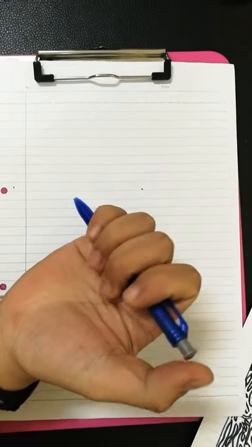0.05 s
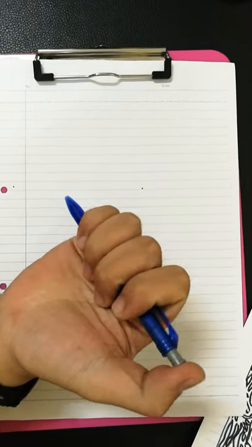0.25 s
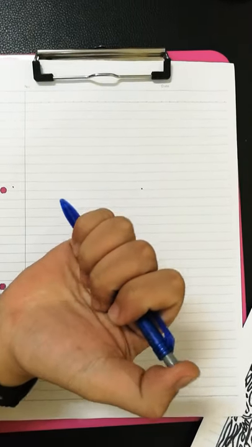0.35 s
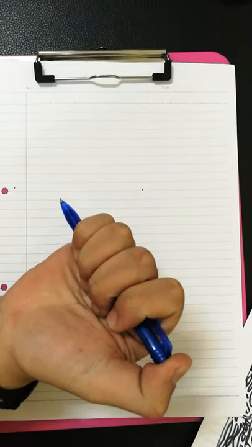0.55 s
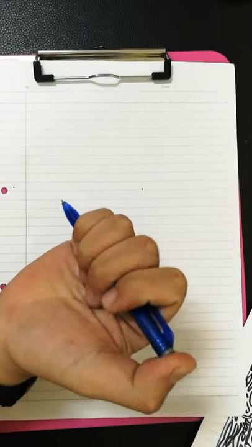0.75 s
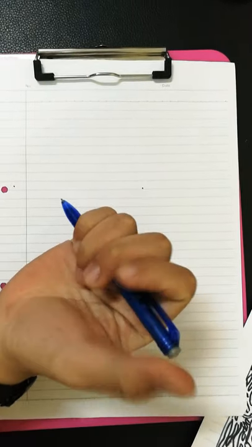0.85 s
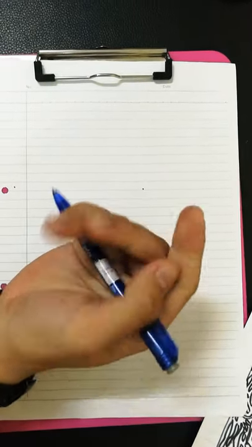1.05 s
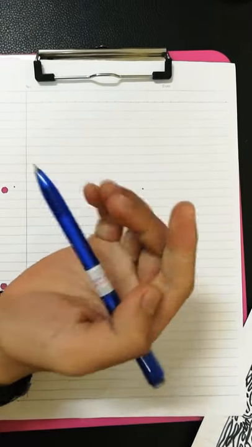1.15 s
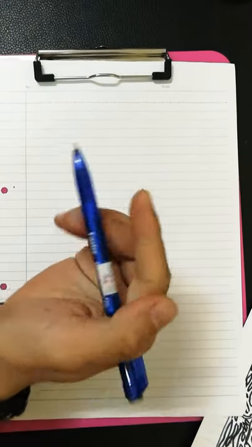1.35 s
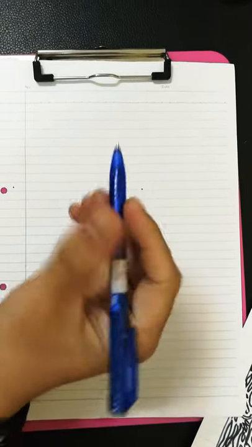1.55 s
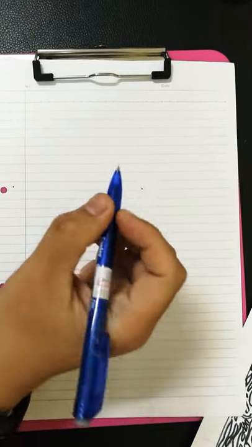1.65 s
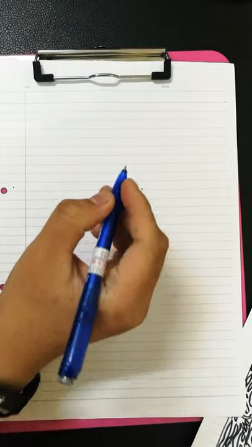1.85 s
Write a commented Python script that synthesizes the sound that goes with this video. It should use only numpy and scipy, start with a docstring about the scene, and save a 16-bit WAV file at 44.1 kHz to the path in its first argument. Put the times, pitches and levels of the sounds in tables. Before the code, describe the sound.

One crisp pen click snaps with a low thump as a thumb presses the button, heard up close in a quiet room. Afterwards the hand shifts the pen with muffled bumps and a faint rub of skin.

```python
"""A plastic ballpoint pen clicks once, close by, above a desk in a small quiet room.
Under the thumb the plunger scrapes; then the latch snaps with a low thump, and its impacts excite
the damped modes of spring and barrel. Desk and walls return reflections and a short bright tail,
coloured by the microphone's treble peaks. The hand bumps softly on the pen and turns it,
with faint friction of skin on the barrel, over a floor of room noise and microphone hiss."""
import sys
import numpy as np
from scipy import signal
from scipy.fft import rfft, irfft
from scipy.io import wavfile

SR = 44100
rng = np.random.default_rng(int(sys.argv[2]) if len(sys.argv) > 2 else 0)


def store_pcm(level_fs):
    """Save levels as 16-bit WAV."""
    pcm = np.round(np.clip(level_fs, -1, 1) * 32767).astype(np.int16)
    wavfile.write(sys.argv[1], SR, np.atleast_2d(pcm).T)


N = 83790
T = np.arange(N) / SR
HZ = np.maximum(np.fft.rfftfreq(N, 1 / SR), 1)
CLICK_S = .3828


def from_db(db):
    """The decibel scale: 20 dB is a factor of ten in amplitude."""
    return 10 ** (np.asarray(db) / 20)


def panned(db):
    """Constant-power panning: two gains for a balance, the left level minus the right."""
    gains = from_db(np.array([[.5], [-.5]]) * db)
    return gains / np.sqrt(np.mean(gains ** 2, axis=0))


def level(rows):
    """Amplitude envelope through (time [s], level [dB]) points."""
    return from_db(np.interp(T, *np.transpose(rows)))


def over_hz(points):
    """Interpolation of (frequency [Hz], value) points on a logarithmic frequency axis."""
    hz, value = np.transpose(points)
    return np.interp(np.log(HZ), np.log(hz), value)


def since(s, ms=0):
    """Time elapsed after an onset at s, delayed by ms; zero before it."""
    return np.maximum(T - s - ms / 1000, 0)


def strokes(rows):
    """Rounded envelopes, each the square root of a half sine."""
    return sum(from_db(db) * np.abs(np.sin(np.pi * np.clip((T - s) / length, 0, 1))) ** .5
               for s, length, db in rows)


def noise(spectrum, pan_db=0, correlation=0):
    """Partially coherent stereo noise of rms 1: mid and side are mixed, then spectrally shaped."""
    mid, side = rfft(rng.standard_normal((2, N)))
    c = np.clip(correlation, -1, 1)
    both = np.sqrt(1 + c) * mid + np.sqrt(1 - c) * side * [[1], [-1]]
    x = irfft(both * from_db(over_hz(spectrum)) * panned(pan_db), N)
    return x / x.std()


def drift(bandwidth_hz):
    """Low-passed Gaussian noise: a slow fluctuation of unit variance."""
    x = irfft(rfft(rng.standard_normal(N)) * np.exp(-(HZ / bandwidth_hz) ** 2), N)
    return (x - x.mean()) / x.std()


def high_pass(x, hz, order=2):
    """A Butterworth filter attenuates what lies below its cutoff."""
    return signal.sosfilt(signal.butter(order, hz, "high", fs=SR, output="sos"), x)


def resonator(impulses, hz, t60):
    """A damped harmonic oscillator answers each impulse with a decaying sine."""
    r, w = from_db(-60 / (t60 * SR)), 2 * np.pi * hz / SR
    return signal.lfilter([0, np.sin(w)], [1, -2 * r * np.cos(w), r * r], impulses + 1e-18)


def modal_response(impulses, modes):
    """Modal superposition: a body vibrates as the sum of its modes, all driven by the same impulses."""
    return sum(from_db(db) * panned(pan_db) * resonator(impulses, hz, t60)
               for hz, db, t60, pan_db in modes)


def room_noise():
    """Ambient noise, slowly sinking, whose coherence between the channels varies with frequency."""
    # envelope (time [s], level [dB])
    envelope = [(0, -50.5), (.25, -51), (.5, -55.5), (.85, -57), (1.4, -59), (1.9, -59.5)]
    # spectrum (frequency [Hz], relative level [dB])
    spectrum = [(150, -21.5), (290, 0.5), (390, -6.5), (480, -8.5), (630, 5), (730, 1), (860, -2),
                (1180, 0.5), (1600, -5), (2200, -8), (3000, -16), (4400, -27), (4850, -24), (5400, -31),
                (8000, -36.5), (16000, -53)]
    # stereo position (frequency [Hz], balance [dB])
    balance = [(200, 7), (400, -3.5), (620, 4.5), (800, -2), (1100, 0), (1500, -2.5), (2200, -6),
               (3000, -1), (4800, 1), (8000, -8)]
    # likeness of left and right (frequency [Hz], correlation [-1 to 1])
    correlation = [(250, 0.95), (450, -0.22), (700, 0.27), (1300, 0.73), (2200, -0.16), (3200, 0.062)]
    return level(envelope) * noise(spectrum, over_hz(balance), over_hz(correlation))


def microphone_hiss():
    """Self-noise, uncorrelated between the channels and strongest near 10 kHz."""
    # envelope (time [s], level [dB])
    envelope = [(0, -70), (.45, -69.5), (.75, -77), (1.9, -76)]
    # spectrum (frequency [Hz], relative level [dB])
    spectrum = [(6000, -11.5), (8400, -17.5), (9300, -0.5), (10000, 2), (10600, 0.5), (11400, -19),
                (16000, -21)]
    # stereo position (frequency [Hz], balance [dB])
    balance = [(6000, 1), (9800, -8.5), (11800, -9), (16000, -2)]
    return level(envelope) * noise(spectrum, over_hz(balance))


def hand():
    """Handling noise: finger bumps are heavily damped oscillations over an uneven low rumble."""
    # rumble of the moving hand (time [s], level [dB])
    envelope = [(0, -40.5), (.25, -42.5), (.55, -42.5), (.69, -48), (.8, -49), (1.1, -47.5), (1.56, -51),
                (1.72, -53), (1.9, -56)]
    # rumble spectrum (frequency [Hz], relative level [dB])
    spectrum = [(20, -6.5), (50, 6), (95, 1), (150, -3.5), (210, -7.5), (290, -8.5), (400, -32), (700, -55)]
    # soft bumps (time [s], level [dB], frequency [Hz])
    bumps = [(0.053, -35.5, 92), (0.1913, -29.5, 84), (0.2141, -30, 110), (0.322, -32, 128),
             (0.4654, -23, 108), (.496, -31, 140), (0.579, -33.5, 68), (.596, -33, 80), (0.749, -29, 124),
             (0.793, -35.5, 78), (0.89, -42, 78), (.964, -43, 80), (1.002, -36.5, 92), (1.242, -36.5, 73),
             (1.296, -39, 54.4), (1.317, -34.5, 71), (1.415, -35.5, 80), (1.505, -35.5, 73.5),
             (1.528, -37.5, 60), (1.645, -40, 107)]
    flicker_db, rise_cycles, right_lag_ms = 2, .315, .108
    flicker = from_db(flicker_db * drift(bandwidth_hz=14))
    out = level(envelope) * flicker * noise(spectrum, correlation=.85)
    for s, db, hz in bumps:
        cycles = since(s) * hz
        swell = cycles / rise_cycles
        out += from_db(db) * swell * np.exp(1 - swell) * np.sin(2 * np.pi * cycles)
    return np.array([out[0], np.interp(since(0, right_lag_ms), T, out[1])])


def skin_slide():
    """Sliding friction of skin on the barrel makes high noise, with a rasp where it is fastest."""
    # slide envelope (time [s], level [dB])
    envelope = [(1.18, -100), (1.31, -74), (1.42, -71), (1.47, -70.5), (1.53, -72.5), (1.7, -75),
                (1.85, -89)]
    # slide spectrum (frequency [Hz], relative level [dB])
    spectrum = [(5000, -7.5), (11000, -17), (12000, -0.5), (12900, 2.5), (14200, -6), (16000, -10)]
    # rasping stroke (time [s], duration [s], level [dB])
    rasp = [(1.44, 0.051, -66.5)]
    # rasp spectrum (frequency [Hz], relative level [dB])
    rasp_spectrum = [(3500, -25), (6000, 2), (8200, -12), (10500, -3), (15000, 2), (16000, -6)]
    pan_db = -8.5
    return level(envelope) * noise(spectrum, pan_db) + strokes(rasp) * noise(rasp_spectrum, pan_db)


def plunger():
    """Friction in the barrel makes bursts of noise; each light impact excites one damped mode."""
    # scraping strokes (time [s], duration [s], level [dB])
    scrapes = [(.328, 0.0075, -57), (.339, 0.035, -58.5), (.593, .012, -70)]
    # friction spectrum (frequency [Hz], relative level [dB])
    spectrum = [(2000, -11), (3400, 0), (5600, 11), (7200, -3), (8300, -6), (10000, -5), (12000, -7),
                (16000, -15)]
    # ticks against the guide (time [s], level [dB], frequency [Hz], T60 [s])
    ticks = [(0.2647, -57, 6830, 0.0099), (0.3792, -40.5, 5640, .006)]
    out = strokes(scrapes) * noise(spectrum, pan_db=-6)
    for s, db, hz, t60 in ticks:
        age = since(s)
        out += from_db(db - 60 * np.minimum(age / t60, 5)) * np.sin(2 * np.pi * hz * age)
    return out


def reverberation():
    """The diffuse field after the click: noise that builds up, then decays exponentially in each band."""
    # room's tail, coloured by the microphone's treble peaks (frequency [Hz], relative level [dB])
    spectrum = [(500, -4), (2000, -7.5), (4000, -14), (7200, -16), (8400, -10.5), (9600, 4), (11300, -10.5),
                (13700, -0.5), (16000, -15)]
    # stereo position (frequency [Hz], balance [dB])
    balance = [(2000, -6), (7000, 1), (9600, -8.5), (15000, -8)]
    # reverberation times (frequency [Hz], T60 [s])
    decay_times = [(2000, 0.27), (5000, 0.46), (9600, 0.35), (14000, 0.35)]
    gain_db, rise_s = -37.5, .003
    diffuse = rfft(noise(spectrum, over_hz(balance)))
    age, tail = since(CLICK_S), np.zeros((2, N))
    for hz, t60 in decay_times:
        band = over_hz([(centre, centre == hz) for centre, _ in decay_times])   # triangular weight
        tail += irfft(diffuse * band, N) * from_db(-60 * age / t60)
    return from_db(gain_db) * (1 - np.exp(-age / rise_s)) * tail


def early_reflections(click):
    """Specular reflection: desk and walls return delayed, weaker copies of the click's treble."""
    # reflection paths (delay [ms], relative level [dB], balance [dB])
    echoes = [(3.7, -7, -3), (5.3, -15, -5), (11.7, -8.5, -13), (13.3, -13, -12), (16.6, -18, -7),
              (21.5, -17, -10), (23.8, -17, -10)]
    gain_db = -1.5
    treble = high_pass(click[1], hz=8260, order=4)
    return sum(from_db(gain_db + db) * panned(pan_db) * np.roll(treble, int(ms * SR / 1000))
               for ms, db, pan_db in echoes)


def thump():
    """A rarefaction pulse: the snap comes with one short dip of pressure at each microphone."""
    # pressure dips, left then right (delay [ms], gain [dB], rise time [s], decay time [s])
    dips = [(1.195, 1.5, 0.00064, 0.0015), (.55, 2.5, 0.00025, 0.00097)]
    out = np.zeros((2, N))
    for channel, (ms, db, rise, decay) in enumerate(dips):
        age = since(CLICK_S, ms)
        out[channel] = -from_db(db) * (1 - np.exp(-age / rise)) ** 2 * np.exp(-age / decay)
    return out


def latch():
    """Impact excitation: a quick run of contacts rings the spring, each with a crack of noise."""
    # latch contacts (delay after the click [ms], level [dB], balance [dB])
    contacts = [(0, -28, 1), (.35, -24, 10), (.85, -25, -12), (1.5, -25, -7), (2.1, -32, -8)]
    # modes of spring and latch (frequency [Hz], gain [dB], T60 [s], balance [dB])
    modes = [(9050, -2.5, 0.012, -2), (9800, 0, 0.012, 14), (10790, -1, 0.0056, -2), (12100, -5, 0.0036, 2),
             (13470, -2.5, .005, -10), (14100, -10, .005, 8)]
    right_lag_ms, crack_gain_db, crack_decay_s = .1, -5.5, .0004
    impulses, crack_envelope = np.zeros((2, 2, N))
    for ms, db, pan_db in contacts:
        age, gain = since(CLICK_S, ms), from_db(db) * panned(pan_db)
        impulses[0, np.argmax(age > 0)] += gain[0, 0]
        impulses[1, np.argmax(since(CLICK_S, ms + right_lag_ms) > 0)] += gain[1, 0]
        crack_envelope += gain * (age > 0) * np.exp(-age / crack_decay_s)
    crack = high_pass(crack_envelope * rng.standard_normal((2, N)), hz=2250)
    return modal_response(impulses, modes) + from_db(crack_gain_db) * crack


def barrel():
    """Free vibration: the plunger lands and rebounds, and the barrel rings in its damped modes."""
    # blows of the plunger (delay after the click [ms], level [dB], balance [dB])
    blows = [(.05, -25, 12), (.95, -22.5, -14), (1.93, -33, -12)]
    # modes of the barrel in the fist (frequency [Hz], gain [dB], T60 [s], balance [dB])
    modes = [(612, -2.5, 0.0097, -7), (1906, -6.5, 0.0078, -9), (2960, -3.5, 0.0081, 0),
             (3740, 3, 0.007, -1), (4920, 3, 0.0065, -14), (5900, -8, 0.0053, 4)]
    impulses = np.zeros((2, N))
    for ms, db, pan_db in blows:
        impulses[:, np.argmax(since(CLICK_S, ms) > 0)] += from_db(db) * panned(pan_db)[:, 0]
    return modal_response(impulses, modes)


def scene():
    """Linear superposition of the click, the room's response, the handling and the background."""
    click = latch() + barrel()
    room = early_reflections(click) + reverberation()
    handling = hand() + plunger() + skin_slide()
    return click + thump() + room + handling + room_noise() + microphone_hiss()


def record(dry):
    """Band limiting: a gentle high-pass blocks infrasound and a steep low-pass cuts the top."""
    low_hz, high_hz = 3.2, 16000
    low_pass = signal.ellip(12, .2, 80, high_hz, fs=SR, output="sos")
    return signal.sosfilt(low_pass, high_pass(dry, low_hz, order=1))


dry = scene()
out = record(dry)
store_pcm(out)
```